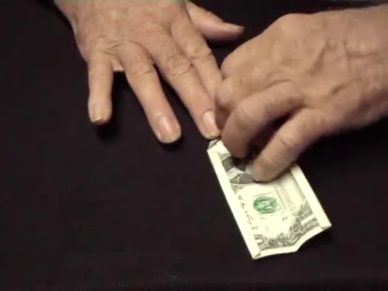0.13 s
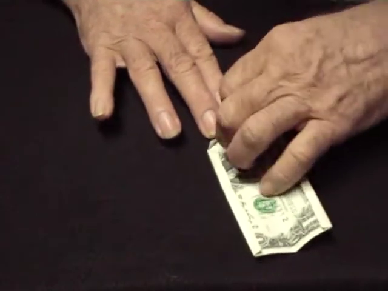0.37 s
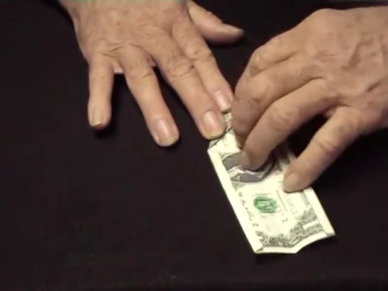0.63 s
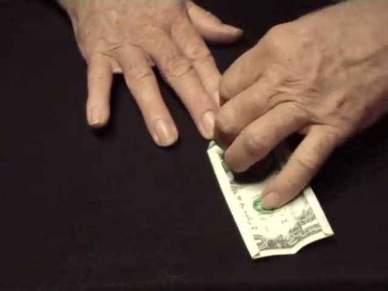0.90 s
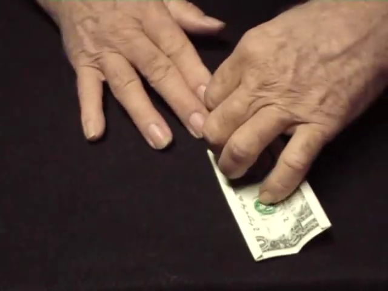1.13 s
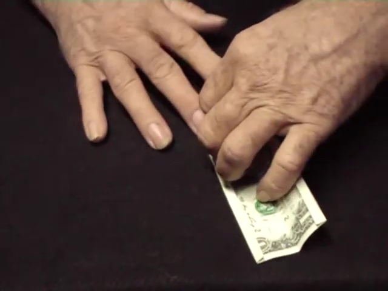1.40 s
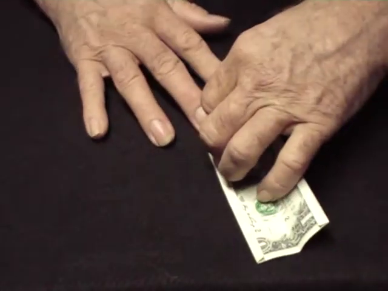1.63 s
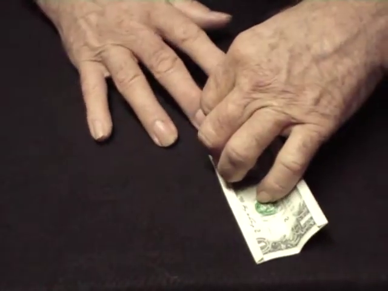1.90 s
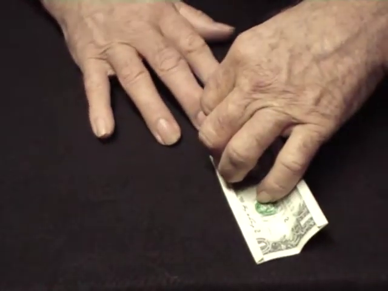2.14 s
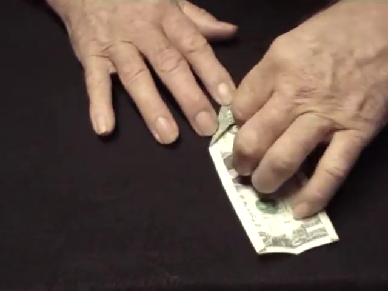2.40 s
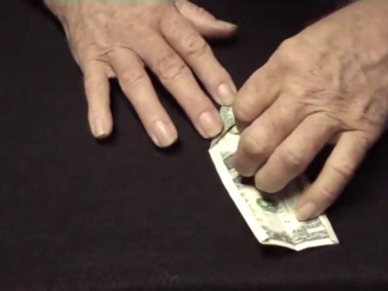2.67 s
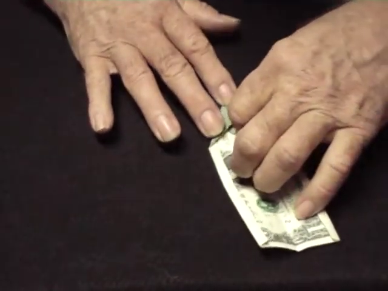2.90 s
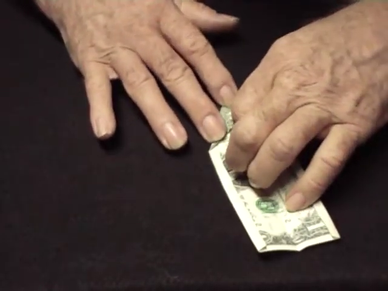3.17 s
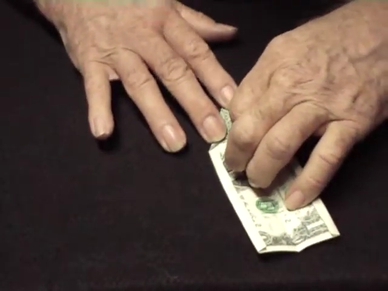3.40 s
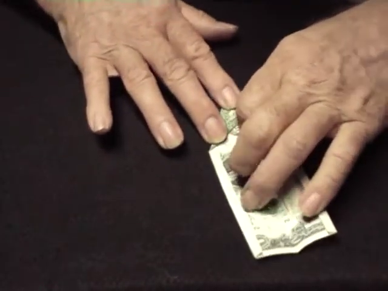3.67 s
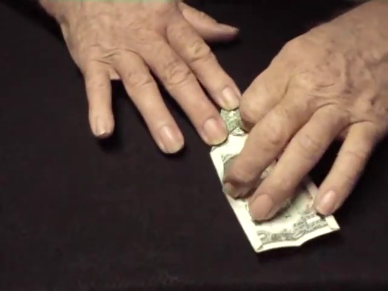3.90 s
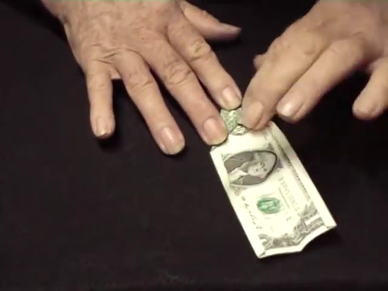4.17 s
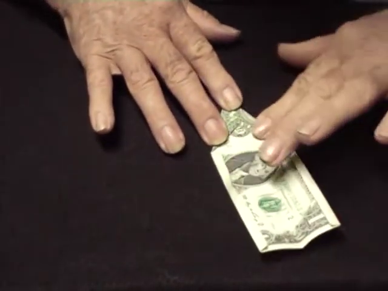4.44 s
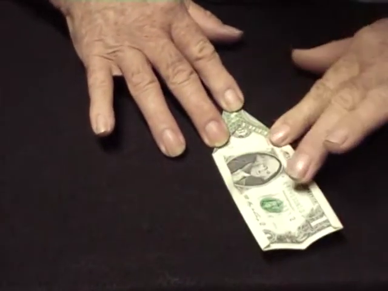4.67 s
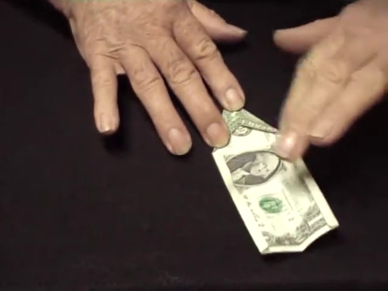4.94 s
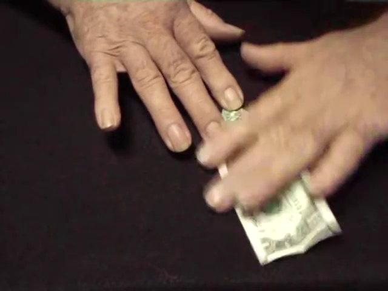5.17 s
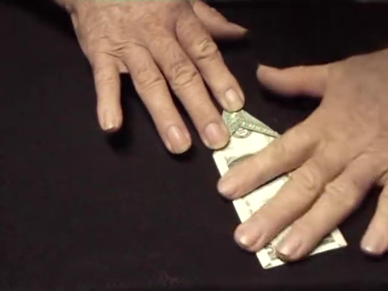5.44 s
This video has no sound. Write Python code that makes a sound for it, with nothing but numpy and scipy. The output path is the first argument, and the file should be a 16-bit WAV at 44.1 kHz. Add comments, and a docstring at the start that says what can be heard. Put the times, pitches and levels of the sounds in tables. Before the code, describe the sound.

Close, dry paper rustling and crinkling as hands fold and smooth a banknote, over a thin mechanical whine, low hum and soft hiss.

```python
"""Skin sliding on paper hisses in grains as fingers fold a banknote and rub its creases flat, close to a
small camera: noise and ticks through the sheet's resonances. Creases snap as short bursts in the same sheet;
fingertips thump the cloth-covered table as dying puffs of noise. Inside the camera a drive whines as noise in
two narrow bands and hums in sines, over shaped noise for the hiss of the room and the microphones."""
import sys
import numpy as np
from scipy import signal
from scipy.fft import rfft, irfft
from scipy.io import wavfile
from scipy.ndimage import uniform_filter1d

SR = 44100
rng = np.random.default_rng(int(sys.argv[2]) if len(sys.argv) > 2 else 0)


def dump_mix(stems):
    """Bounce the given channels to the path in sys.argv[1] as a 16-bit WAV at rate SR."""
    frames = np.atleast_2d(stems).T  # one column per channel
    limited = np.clip(frames, -1, 1)  # hard clip at full scale
    pcm = np.round(limited * 32767).astype(np.int16)
    wavfile.write(sys.argv[1], SR, pcm)


def volts_from_db(level):
    """Convert decibel levels to linear amplitude ratios."""
    exponent = np.asarray(level, float) / 20
    return 10 ** exponent


N = 245227   # length in samples


def rms_one(x):
    """Scale to rms 1."""
    return x / np.sqrt(np.mean(x ** 2) + 1e-20)


def in_time(rows):
    """Columns of a curve, read at every sample."""
    s, *columns = np.transpose(rows)
    return [np.interp(np.arange(N) / SR, s, column) for column in columns]


def at_hz(points, hz):
    """A spectrum read on a log-frequency axis."""
    point_hz, value = np.transpose(points)
    return np.interp(np.log(hz), np.log(point_hz), value)


def drift(rate):
    """Slow chance of spread 1: noise smoothed twice at rate (Hz)."""
    r = np.exp(-2 * np.pi * rate / SR)
    smooth = signal.lfilter([1], [1, -2 * r, r * r], rng.standard_normal(N + SR))
    return rms_one(smooth[SR:])   # without the filter's run-in


def resonate(x, hz, width):
    """One resonance, gain 1 on top."""
    r = np.exp(-np.pi * width / SR)
    feed = np.array([1, 0, -1]) * (1 - r * r) / 2
    return signal.lfilter(feed, [1, -2 * r * np.cos(2 * np.pi * hz / SR), r * r], x + 1e-18)


def broad(x, hz, width):
    """A steep-sided resonance (applied twice), scaled so that white noise keeps its rms."""
    def through(v):
        return resonate(resonate(v, hz, width), hz, width)
    impulse = np.eye(1, 4096)[0]
    return through(x) / np.sqrt(np.sum(through(impulse) ** 2))


# broad resonances of the sheet, in the order core, bright edge, slack parts, weight: (f/Hz, width/Hz)
SHEET = [(5670, 2700), (8770, 5000), (4150, 2300), (1364, 1880)]
WEIGHT_FOLLOWS = 0.49   # the weight's share of the slackness

# strokes of skin over paper:
# (t/s of firmest contact, rise/s, fall/s, core level/dB, slack parts level/dB against the core)
STROKES = [(0.036, 0.041, 0.048, -35.5, -15), (0.1, 0.073, 0.13, -45, -8), (0.17, 0.25, 0.12, -41, -11),
           (0.263, 0.021, 0.18, -37.5, -6), (0.451, 0.094, 0.074, -40.5, -10),
           (0.521, 0.062, 0.14, -42.5, -6), (0.615, 0.051, 0.029, -38.5, 0),
           (0.707, 0.23, 0.03, -44.5, -2.5), (0.808, .11, .07, -40.5, -9), (0.89, 0.038, 0.1, -42.5, -8),
           (0.938, 0.065, 0.047, -43.5, -21), (1.09, 0.12, 0.17, -47, -7), (1.177, 0.17, 0.091, -48, -2),
           (1.267, .05, 0.14, -48, -15), (1.423, 0.079, 0.076, -46.5, -5),
           (1.477, 0.027, 0.037, -50.5, -20), (1.539, .02, 0.053, -47.5, -4), (1.6, .04, 0.055, -45, -7),
           (1.768, 0.19, 0.087, -49, -20), (1.842, 0.14, 0.021, -49, -6), (2.063, .15, 0.028, -50.5, -27),
           (2.119, 0.038, 0.027, -65, 1), (2.31, 0.032, 0.18, -40, -4), (2.385, 0.17, 0.12, -32.5, -17),
           (2.474, 0.056, 0.13, -49, -4), (2.554, 0.15, 0.085, -46, -7), (2.62, 0.072, .1, -48.5, -4),
           (2.77, 0.12, 0.076, -41.5, -7), (2.969, .15, 0.32, -53, -21), (3.111, 0.061, 0.086, -40, -10),
           (3.265, 0.048, 0.067, -51, 3), (3.37, 0.052, 0.092, -59.5, -11),
           (3.54, 0.025, 0.032, -53.5, -11), (3.59, 0.031, .06, -43.5, -5), (3.63, 0.074, 0.17, -32, -5),
           (3.773, 0.065, 0.068, -38.5, 1), (3.858, 0.15, 0.13, -37, -2), (4.012, 0.024, 0.028, -44, 2),
           (4.026, 0.019, 0.073, -32, -1), (4.052, 0.041, 0.091, -33, -5.5),
           (4.13, 0.13, 0.029, -40.5, -31), (4.325, 0.035, .05, -41.5, -18), (4.42, 0.18, .08, -49.5, -22),
           (4.518, 0.056, .05, -45, -17), (4.552, 0.022, 0.11, -40, -18), (4.606, 0.11, .1, -42, -7),
           (4.68, .06, 0.12, -49.5, -11), (4.767, 0.04, 0.056, -46, -19), (4.817, 0.0081, 0.15, -46, -5),
           (4.93, 0.22, 0.052, -40, -14), (5.009, 0.043, .026, -33.5, -20), (5.262, 0.01, 0.25, -37, -4.5),
           (5.35, 0.12, 0.14, -35, -19), (5.442, 0.11, 0.093, -30.5, -8), (5.559, 0.036, .03, -30.5, -10)]
# tautness of the sheet, heard as its bright edge: (t/s, level/dB against the strokes' core)
TAUTNESS = [(0, -22), (.3, -8.5), (.55, -16), (1.0, -15), (1.3, -13), (1.6, -18), (2.0, -8), (2.35, -20),
            (2.6, -10), (2.8, -18), (3.1, -14), (3.5, 0), (3.65, -23), (3.78, -27), (3.86, -14),
            (4.05, -6.5), (4.35, -10.5), (4.6, -17), (4.8, -14), (5.01, -30), (5.25, -11.5), (5.56, -16.5)]
RISE_POWER, FALL_POWER = 1.64, 1.53   # how pressure comes on and lets go
WEIGHT_DB = -12   # the sheet's weight against the core
# fingers merely resting on the sheet: core, then bright edge and slack parts against it, and its wavering
REST_DB, REST_BRIGHT_DB, REST_SLACK_DB, REST_WAVER_DB = -64, -9, -28, 3.5


def contact():
    """Gains of the four parts of the sheet: the strokes add in power over the resting fingers."""
    t = np.arange(N) / SR
    rest = volts_from_db(REST_DB + REST_WAVER_DB * drift(2.5))
    taut = volts_from_db(in_time(TAUTNESS)[0])
    rest_parts = volts_from_db([[0], [REST_BRIGHT_DB], [REST_SLACK_DB], [WEIGHT_FOLLOWS * REST_SLACK_DB]])
    core, bright, slack, weight = (rest * rest_parts) ** 2
    for s, rise, fall, db, slack_db in STROKES:
        span = slice(max(int((s - rise) * SR), 0), int((s + fall) * SR))
        late = t[span] - s
        coming = np.clip(1 + late / rise, 0, 1) ** RISE_POWER
        going = np.clip(1 - late / fall, 0, 1) ** FALL_POWER
        pressure = np.where(late < 0, coming, going)
        core[span] += (volts_from_db(db) * pressure) ** 2
        bright[span] += (volts_from_db(db) * taut[span] * pressure) ** 2
        slack[span] += (volts_from_db(db + slack_db) * pressure) ** 2
        weight[span] += (volts_from_db(db + WEIGHT_FOLLOWS * slack_db) * pressure) ** 2
    return np.sqrt(core), np.sqrt(bright), np.sqrt(slack), np.sqrt(weight) * volts_from_db(WEIGHT_DB)


def rubbing(flutter_db, grains_per_s, grain_db, grain_spread_db, patchy_db, shifting_db):
    """Skin sticks and slips on the fibres: fluttering noise with clumped ticks; each part of the sheet wavers."""
    flutter = volts_from_db(flutter_db * drift(110))
    born = rng.random(N) < grains_per_s * volts_from_db(3 * drift(40)) / SR   # the drift clumps the grains
    grain_level = volts_from_db(grain_db + grain_spread_db * np.minimum(rng.exponential(1, N), 4))
    grains = born * grain_level * rng.choice([-1, 1], N)
    paper = np.zeros(N)
    for gain, (hz, width) in zip(contact(), SHEET):
        friction = rms_one(rng.standard_normal(N) * flutter + grains)
        waver = volts_from_db(patchy_db * drift(51) + shifting_db * drift(10.4))
        paper += broad(friction * gain * waver, hz, width)
    return paper


# creases snapping: (t/s, core energy level/dB, bright edge level/dB and slack parts level/dB against the core)
SNAPS = [(0.0323, -20.5, -16, -12), (0.1611, -11.5, -17, -14), (0.2635, -17.5, -19, -7),
         (0.5553, -19.5, -18, -17), (0.6094, -17.5, -18, -13), (0.621, -12.5, -22, -14),
         (0.6434, -10.5, -19, -9), (0.6661, -18.5, -17, -18), (0.6941, -15.5, -15, -12),
         (0.8159, -13, -18, -19), (1.0151, -23.5, -20, -16), (1.1075, -19.5, -21, -17),
         (1.261, -17.5, -22, -19), (1.3514, -24, -22, -8), (1.4171, -11.5, -17, -10),
         (1.5341, -28, -11, -9), (1.5895, -15.5, -18, -12), (1.8424, -21.5, -24, -30),
         (2.118, -22.5, -22, -10), (2.2832, -26.5, -19, -11), (2.3056, -7.5, -21, -13),
         (2.5335, -14.5, -20, -15), (2.7337, -22.5, -11, -8), (2.7607, -17.5, -17, -26),
         (3.5138, -26, -19, -10), (3.59, -22, -21, -4), (3.6269, -3.5, -26, -15), (3.8269, -14.5, -26, -14),
         (4.0209, 4.5, -5.5, -15), (4.0515, -10.5, -11, -6), (4.2954, -20.5, -17, -10),
         (4.3262, -23, -15, -12), (4.3716, -25.5, -9, -20), (4.4291, -24.5, -21, -20),
         (4.4792, -26.5, -25, -18), (4.5049, -23.5, -19, -15), (4.5488, -9.5, -20, -12),
         (4.8109, -1, -13, -13), (4.9973, -24.5, -19, -19), (5.0035, -21.5, -22, -23),
         (5.255, -22.5, -24, -19), (5.2622, -22, -12, -6), (5.5469, -16.5, -21, -16)]
SNAP_WEIGHT_DB, BIG_SNAP_LIGHTER = -7, 0.37   # weight against slack parts; dB lost per dB of snap above -14


def snaps(length_s, after_share):
    """A crease buckles in a millisecond or so: a tick and dying after-ticks ring the sheet."""
    force, t = np.zeros((4, N + 500)), np.arange(500) / SR
    after_ticks = rng.standard_normal((len(SNAPS), 500))
    for (s, db, bright_db, slack_db), ticks in zip(SNAPS, after_ticks):
        burst = (t == 0) + after_share * ticks * np.exp(-t / length_s)
        burst = burst / np.linalg.norm(burst)
        weight_db = slack_db + SNAP_WEIGHT_DB - BIG_SNAP_LIGHTER * max(db + 14, 0)
        part_db = db + np.array([0, bright_db, slack_db, weight_db])
        i = round(s * SR)
        force[:, i:i + 500] += volts_from_db(part_db)[:, None] * burst
    return sum(broad(part[:N], hz, width) for part, (hz, width) in zip(force, SHEET))


# fingertips landing, and one short scrape near 3.3 kHz:
# (t/s, level/dB before the common gain, centre f/Hz, t60/s, drive into the table top level/dB)
THUMPS = [(0.078, -50, 1510, .1, -21), (0.166, -49.5, 1270, 0.25, -19), (0.26, -42, 1330, 0.28, -17),
          (1.415, -41.5, 1230, 0.093, -27), (1.78, -30.5, 555, 0.19, -6), (2.307, -36, 1520, 0.068, -14),
          (2.695, -31.5, 915, 0.2, -12), (2.708, -48, 805, 0.11, -10), (2.764, -43.5, 1000, 0.23, -5),
          (3.166, -47, 1380, .1, -20), (3.755, -47.5, 1510, 0.38, -20), (3.84, -46, 1430, 0.5, -16),
          (4.113, -41, 534, 0.23, 7), (4.511, -38.5, 900, 0.74, -7), (4.547, -42.5, 1620, 0.12, -8.5),
          (4.599, -33, 3260, 0.35, -34), (4.6, -38.5, 656, 0.17, -8.5), (4.809, -36.5, 910, 0.26, -14.5),
          (5.265, -37.5, 1570, 0.11, -16)]
# resonances of the table top: (f/Hz, width/Hz, level/dB before a common lift)
TABLE_TOP = [(170, 150, -0.5), (340, 370, 2)]
PAT_WIDTH_HZ, PAT_WIDTH_SHARE = 560, 0.44   # breadth of a puff: a base plus a share of its centre
TAP_DB, TAP_S = -2, .003   # the first touch stands out of the puff
# landings within the octave above POCKET_FROM_HZ also ring the air pocket under the note
POCKET_DB, POCKET_WIDTH_HZ, POCKET_FROM_HZ = -3, 160, 1150


def thumps(gain_db, rise_s):
    """A soft landing or scrape: a dying puff of noise around its centre, and the same puff in the table top."""
    pat, thud, t = np.zeros(N + 8000), np.zeros(N + 8000), np.arange(8000) / SR
    uneven = np.pad(volts_from_db(2.5 * drift(58)), (0, 8000))   # flesh and cloth settle in small jerks
    puffs = rng.standard_normal((len(THUMPS), 8000))
    for (s, db, hz, t60, thud_db), puff in zip(THUMPS, puffs):
        i = round(s * SR)
        dying = volts_from_db(db + gain_db - 60 * t / t60) * np.minimum(t / rise_s, 1)
        dying = dying * (1 + volts_from_db(TAP_DB) * np.exp(-t / TAP_S)) * uneven[i:i + 8000]
        pat[i:i + 8000] += dying * broad(puff, hz, PAT_WIDTH_HZ + PAT_WIDTH_SHARE * hz)
        if POCKET_FROM_HZ < hz < 2 * POCKET_FROM_HZ:
            pat[i:i + 8000] += volts_from_db(POCKET_DB) * dying * broad(puff, hz, POCKET_WIDTH_HZ)
        thud[i:i + 8000] += dying * volts_from_db(thud_db) * puff
    table = np.zeros(N)
    for k, (hz, width, db) in enumerate(TABLE_TOP):
        table += (-1) ** k * volts_from_db(db + 17) * resonate(thud[:N], hz, width)   # neighbours in opposite sign
    return pat[:N] + table


MIC_TOP_HZ = 13600
CAPSULE_HZ, CAPSULE_WIDTH_HZ, CAPSULE_GAIN = 6990, 430, 0.28   # the capsules' own peak
HOLLOW_HZ, HOLLOW_WIDTH_HZ, HOLLOW_DEPTH = 3820, 1900, 0.28   # and a hollow below it


def capsules(x):
    """The microphone capsules lose the top, peak at a resonance and dip below it."""
    x = signal.sosfilt(signal.butter(4, MIC_TOP_HZ, fs=SR, output="sos"), x)
    peak = CAPSULE_GAIN * resonate(x, CAPSULE_HZ, CAPSULE_WIDTH_HZ)
    hollow = HOLLOW_DEPTH * resonate(x, HOLLOW_HZ, HOLLOW_WIDTH_HZ)
    return x + peak - hollow


LEAN_HZ, LEAN_Q, LEAN_SHARE = 9200, 4.8, 0.18
SCATTER_S, SCATTER_DB = .004, -11
WIDE_FROM_HZ = 7430   # stereo width starts steeply above this pitch; below it the channels are nearly alike
FAINT_DB = -23   # a faint stereo scatter at all pitches, against the scatter


def stereo_width(x):
    """The left leads at a treble resonance and is louder above it; nearby surfaces scatter sound unequally."""
    w = 2 * np.pi * LEAN_HZ / SR
    a, c = np.sin(w) / (2 * LEAN_Q), np.cos(w)
    # resonant high-pass
    lean = LEAN_SHARE * signal.lfilter([(1 + c) / 2, -1 - c, (1 + c) / 2], [1 + a, -2 * c, 1 - a], x)
    cloud = rng.standard_normal(3000) * np.exp(-np.arange(3000) / SR / SCATTER_S)
    cloud = cloud / np.sqrt(np.sum(cloud ** 2))
    scatter = volts_from_db(SCATTER_DB) * signal.fftconvolve(x, cloud)[:N]
    steep = signal.butter(7, WIDE_FROM_HZ, "high", fs=SR, output="sos")
    side = signal.sosfiltfilt(steep, lean + scatter) + volts_from_db(FAINT_DB) * scatter
    return x + side * [[1], [-1]]


def housing(noise, hz, peak, skirt, evenness):
    """Bearing noise in one resonance; the steady drive evens out part of its chance swells."""
    ringing = resonate(resonate(resonate(noise, hz, peak), hz, skirt), hz, 2 * skirt)
    swell = uniform_filter1d(rms_one(ringing) ** 2, size=400) + 0.085
    return rms_one(ringing / swell ** (evenness / 2))


# the drive: (t/s, gliding hum level/dB, steady hum level/dB, whine level/dB)
DRIVE = [(0, -58, -53, -43), (1.4, -53, -55.5, -43), (2.8, -52, -56, -43.5), (3.1, -64, -56.5, -44.5),
         (3.5, -79, -51.5, -45.5), (3.8, -56.5, -65, -47), (4.2, -54.5, -115, -47), (4.5, -60.5, -80, -44),
         (4.8, -49, -86, -46.5), (5.1, -68, -54.5, -46), (5.56, -81, -52, -44.5)]
# pitch of the gliding hum: (t/s, f/Hz)
GLIDING_HZ = [(0, 101.76), (2.8, 101.76), (3.05, 98.6), (5.56, 98.5)]
# housing resonances that whine: (f/Hz) each
WHINE_HZ = [3120, 2435]
# their shape: (peak width/Hz, skirt width/Hz, level/dB against the whine level, slow swell/dB either way)
WHINE_SHAPE = [(93, 380, -2.5, 0.2), (111, 270, -12.5, 3)]
# pitches of the steady tones: (f/Hz) each
TONE_HZ = [33.1, 203.4, 841, 1261.7]
# the same tones: (rms level/dB around which they drift, lean -1 right to 1 left)
TONES = [(-63.5, 0.25), (-70.5, 0.26), (-72, 0), (-71, 0)]
STEADY_HZ, SPIN_HZ = 100.1, 30.95   # the steady hum; the spin of the drive
SWELL_HZ, SWELL_TOP_S = 2.28, .41   # a slow wheel in the drive, and a moment when its swell peaks


def drive(once, twice, fourfold):
    """Two hum tones near 100 Hz swell, fade and beat; bearing noise throbs with the spin and rings the housing."""
    gliding_db, steady_db, whine_db = in_time(DRIVE)
    t = np.arange(N) / SR
    steady = volts_from_db(steady_db) * np.sin(2 * np.pi * STEADY_HZ * t)
    gliding_phase = 2 * np.pi * np.cumsum(in_time(GLIDING_HZ)[0]) / SR + .95
    gliding = volts_from_db(gliding_db) * np.sin(gliding_phase)
    hum = np.sqrt(2) * (steady + gliding) * volts_from_db([[.5], [-.5]])   # slightly louder on the left

    turn = 2 * np.pi * SPIN_HZ * t
    throb = 1 + once * np.cos(turn) + twice * np.cos(2 * turn) + fourfold * np.cos(4 * turn)
    wheel = np.cos(2 * np.pi * SWELL_HZ * (t - SWELL_TOP_S))
    whine = np.zeros(N)
    bearing = rng.standard_normal((len(WHINE_SHAPE), N))
    for hz, (peak, skirt, db, swell_db), noise in zip(WHINE_HZ, WHINE_SHAPE, bearing):
        whine += volts_from_db(db + swell_db * wheel) * housing(noise, hz, peak, skirt, evenness=0.17)

    tones = np.zeros((2, N))
    for hz, (db, lean) in zip(TONE_HZ, TONES):
        tone = np.sqrt(2) * volts_from_db(db + 0.85 * drift(1)) * np.sin(2 * np.pi * hz * t)
        tones += tone * [[1 + lean], [1 - lean]]
    return hum + tones + volts_from_db(whine_db) * whine * throb


# spectrum of the hiss and rumble: (f/Hz, relative level/dB)
FLOOR_SPECTRUM = [(20, 2), (35, -12), (60, 5), (130, -1.5), (250, -10), (600, -11.5), (1200, -14),
                  (1900, -19.5), (3700, -24.5), (4600, -17.5), (6000, -15), (8000, -23.5), (11000, -36),
                  (16000, -37)]
# left-right likeness of the floor: (f/Hz, likeness 0..1)
LIKENESS = [(30, .99), (80, .98), (130, .92), (290, .6), (640, .7), (1400, .75), (2400, .995), (3400, 1),
            (6700, 1), (8200, .4), (15000, .1)]
FLOOR_DB = -53   # rms over both channels, before a slight lean to the left


def floor():
    """Steady hiss and rumble, nearly alike in both channels at 2.4-6.7 kHz, unlike in the treble."""
    hz = np.maximum(np.arange(N // 2 + 1) * SR / N, 5)
    alike = np.clip(at_hz(LIKENESS, hz), 0, 1)
    colour = volts_from_db(at_hz(FLOOR_SPECTRUM, hz)) * np.minimum(hz / 20, 1) ** 2   # falls away below 20 Hz
    mid, side = rfft(rng.standard_normal((2, N))) * colour
    both = np.sqrt(1 + alike) * mid + np.sqrt(1 - alike) * side * [[1], [-1]]
    return volts_from_db(FLOOR_DB) * rms_one(irfft(both, N)) * volts_from_db([[.4], [-.4]])


def scene():
    """Hands and paper heard through the capsules in stereo, plus the camera's drive and the floor."""
    hands = rubbing(flutter_db=1.87, grains_per_s=410, grain_db=3.5, grain_spread_db=3.5,
                    patchy_db=0.64, shifting_db=1.37)
    hands = hands + snaps(length_s=0.00087, after_share=0.15)
    hands = hands + thumps(gain_db=-7, rise_s=0.00094)
    heard = stereo_width(capsules(hands))
    return heard + drive(once=0.026, twice=0.16, fourfold=0.13) + floor()


def roll_off(x):
    """The treble ends steeply here."""
    return signal.sosfilt(signal.butter(12, 16480, fs=SR, output="sos"), x)


def record(dry):
    """Deliver the finished mix."""
    return roll_off(dry)


dry = scene()
out = record(dry)
dump_mix(out)
```